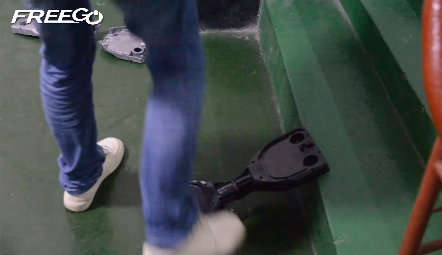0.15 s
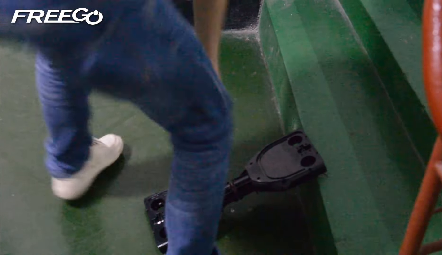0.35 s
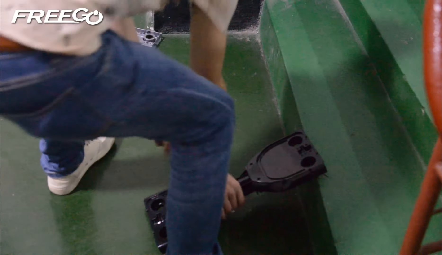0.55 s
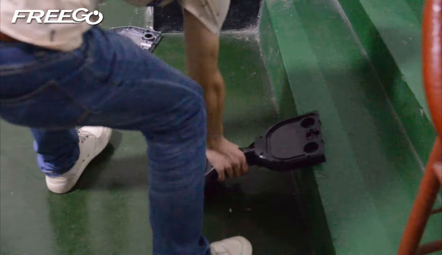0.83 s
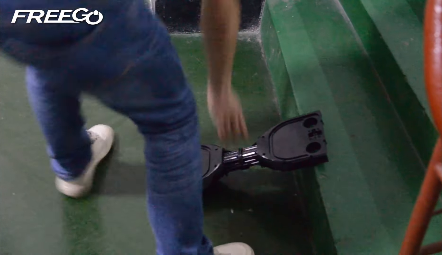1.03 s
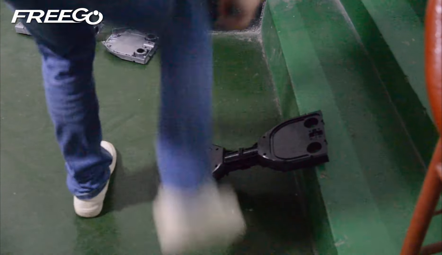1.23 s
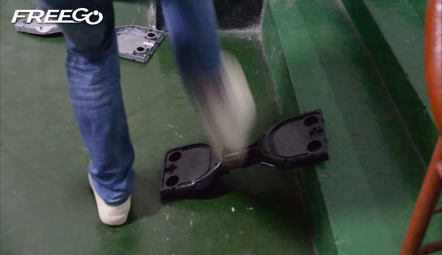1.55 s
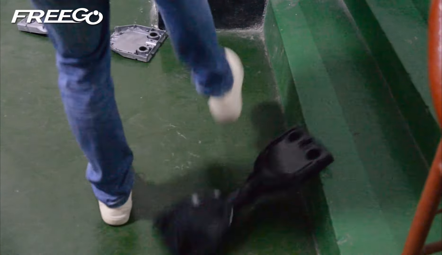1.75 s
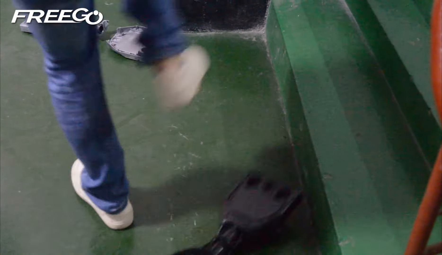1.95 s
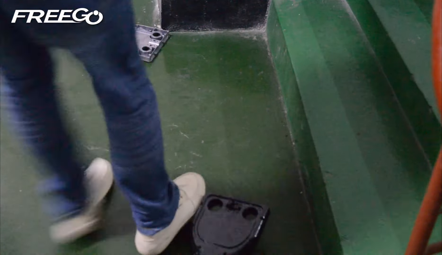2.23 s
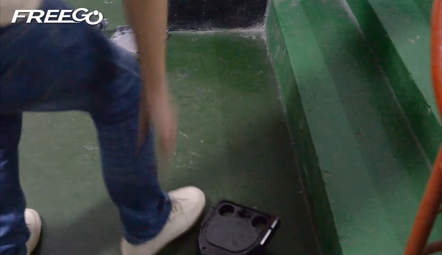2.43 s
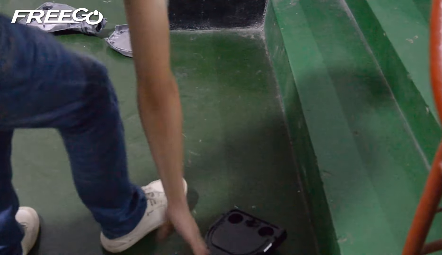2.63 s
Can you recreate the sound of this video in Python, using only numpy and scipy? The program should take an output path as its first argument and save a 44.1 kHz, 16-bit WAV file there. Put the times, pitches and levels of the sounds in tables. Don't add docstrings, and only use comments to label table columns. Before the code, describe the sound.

Shoe stamps on a metal scooter frame, hard clattering knocks with short rings in a bare hall

```python
import sys
import numpy as np
from scipy import signal
from scipy.fft import rfft, irfft
from scipy.io import wavfile

SR = 44100
rng = np.random.default_rng(int(sys.argv[2]) if len(sys.argv) > 2 else 0)


def dump_mix(stems):
    frames = np.atleast_2d(stems).T
    limited = np.clip(frames, -1, 1)
    pcm = np.round(limited * 32767).astype(np.int16)
    wavfile.write(sys.argv[1], SR, pcm)


def invert_db(level):
    return 10 ** (np.asarray(level, dtype=float) / 20)


N = 121275
LEAD = SR // 2

# freq_hz, density_db_per_hz
AIR_SPECTRUM = [(25, -60), (55, 18.5), (130, 1.5), (300, 8.5), (800, -3.5), (2000, -1), (4000, -11),
                (15600, -28.5)]
# freq_hz, width_hz, level_db
MACHINE_HUMS = [
    (52.8, 48, -47.5),
    (187.6, 15, -49),
]
# freq_hz, t60_s
HALL_DECAY = [(125, 1.76), (500, 1.35), (1000, 1.42), (2000, 1.225), (4000, 1.277), (8000, 1.03),
              (15000, 0.16)]
# start_s, level_db, pitch_hz
SOLE_THUMPS = [
    (0.244, -26, 265),
    (0.274, -13.5, 306),
    (1.011, -12, 264),
    (1.031, -21, 297),
    (2.658, -44, 125),
]
# start_s, length_s, level_db
SHOE_SCUFFS = [
    (0.09, 0.18, -33.5),
    (0.875, 0.13, -39),
    (2.247, 0.25, -33.5),
    (2.383, 0.05, -29),
    (2.5, 0.24, -43),
]
# start_s, level_db
GRIT_TICKS = [(2.284, -47), (2.299, -42), (2.310, -41), (2.349, -43), (2.525, -43), (2.535, -46)]
# freq_hz, density_db_per_hz
SCUFF_SPECTRUM = [(800, 15), (3500, -9), (9000, -3), (15000, -14)]
# start_s, level_db, lowest_mode_db, crack_db, brightness_db
WEDGED_KNOCKS = [
    (-.3, -13, 1, 8.5, -12),
    (.2409, 0, -4.5, 4, 0.5),
    (.255, -2, -3.5, 9, 1.5),
    (.268, -1, 2.5, 9.5, 5),
    (.293, 1.5, -3, 10.5, 0.5),
    (.375, -3, 1, 6.5, 1.5),
    (.435, -3.5, 1.5, 8.5, -2),
    (.7627, -28, -6, 12, -9),
]
# start_s, level_db, lowest_mode_db, crack_db, brightness_db
LANDING_KNOCKS = [
    (1.008, -25, -2, 14, 1),
    (1.0126, -9, 10, 10, 7),
    (1.037, -25, 2, 9, 10.5),
    (1.056, -18.5, 3, 7.5, -1.5),
    (1.075, -16, -17, 7, -7.5),
]
# start_s, level_db, lowest_mode_db, crack_db, brightness_db
LOOSE_KNOCKS = [(1.1548, -17.5, 9.5, 3, -4.5), (1.17, -19, 4, -11, -2), (1.2531, -5.5, -3.5, 1.5, -3.5),
                (1.3628, -5.5, 1.5, 4, -1.5), (1.3753, -3, -0.5, 6.5, 2), (1.4272, 1, 3, 0.5, 1.5),
                (1.466, -7.5, 4.5, 0, -1.5), (1.505, -13.5, -9, -5, -5.5), (1.5963, -5.5, 6, 3.5, -2.5),
                (1.6716, -5.5, 5, 2, 0), (2.0547, -9.5, 0, -0.5, -4.5), (2.118, -22, 2, 6, -16),
                (2.315, -20, 4.5, -3, -9), (2.352, -25.5, 8, 3, -3), (2.4104, -19, 3, -2, 3.5),
                (2.46, -28.5, 5, 3, 2.5)]
# freq_hz, width_hz, level_db
MODES_WEDGED = [(992, 80, 0), (1520, 60, -8), (1945, 60, -1), (2755, 40, -7), (3035, 36, -12),
                (3532, 36, -10), (4010, 34, -14), (4720, 30, -12), (5045, 55, -14), (5800, 150, -14),
                (6800, 90, -15), (7293, 44, -17), (7915, 30, -16), (9235, 36, -20)]
# freq_hz, width_hz, level_db
MODES_LANDING = [(655, 60, -8), (762, 60, -6), (900, 70, -6), (1020, 70, -4), (1127, 50, -5),
                 (1237, 50, -6), (1803, 80, -6), (2061, 60, -4), (2150, 60, -6), (2760, 50, -10),
                 (3900, 140, -17), (5400, 150, -18), (7280, 80, -23)]
# freq_hz, width_hz, level_db
MODES_LOOSE = [(1008, 46, 0), (2025, 32, -7), (2765, 36, -9), (3045, 44, -13), (3480, 36, -15),
               (3700, 50, -20), (4150, 70, -19), (4715, 30, -21), (5015, 40, -21), (5700, 90, -21),
               (6200, 50, -21), (6720, 70, -21), (7275, 36, -22), (9225, 30, -26)]
# freq_hz, density_db_per_hz
FLOOR_CRACK = [(200, -57), (450, -10), (650, -38), (900, -5), (1350, -19), (1750, -3.5), (4000, -24.5),
               (9000, -30), (15600, -45)]
# freq_hz, density_db_per_hz
STAMP_CRACK = [(200, -62), (560, -70), (800, -12.5), (1000, -4), (1350, -15), (1800, -3), (4000, -14),
               (9000, -22.5), (15600, -36)]
# time_s, gain_db
INPUT_GAIN = [(0, 3.5), (0.248, 4.5), (0.273, -9.5), (0.292, -13.5), (.4, -9), (.52, -11), (.64, -9.5),
              (.8, -5.5), (1.019, 2.5), (1.1, -1), (1.36, -3), (1.42, -5.5), (1.6, -7.5), (1.752, -9.5),
              (1.842, -4), (2.75, 3)]


def unit(x):
    return x / np.sqrt(np.mean(x ** 2))


def log_hz(n):
    return np.log2(np.maximum(np.fft.rfftfreq(n, 1 / SR), 10))


def colour(x, points, tilt_db=0.):
    octave = log_hz(len(x))
    p = np.array(points)
    gain_db = np.interp(octave, np.log2(p[:, 0]), p[:, 1]) + tilt_db * (octave - 11) / 2
    return irfft(rfft(x) * invert_db(gain_db), len(x))


def ring(x, freq_hz, width_hz):
    radius = np.exp(-np.pi * width_hz / SR)
    w = 2 * np.pi * freq_hz / SR
    return signal.lfilter([0, np.sin(w)], [1, -2 * radius * np.cos(w), radius * radius], x)


def add(out, start_s, x):
    i = int(start_s * SR) + LEAD
    out[i:i + len(x)] += x[:len(out) - i]


def background():
    air_db = -32.5
    out = invert_db(air_db) * unit(colour(rng.standard_normal(N), AIR_SPECTRUM))
    for freq_hz, width_hz, db in MACHINE_HUMS:
        out += invert_db(db) * unit(ring(rng.standard_normal(N), freq_hz, width_hz))
    return out


def hall(x):
    level_db, build_s = 1, 0.0056
    t = np.arange(2 * SR) / SR
    p = np.array(HALL_DECAY)
    noise = rfft(rng.standard_normal(len(t)))
    octave = log_hz(len(t))
    tail = np.zeros(len(t))
    for centre in np.arange(6, 14.6, .5):
        band = irfft(noise * np.clip(1 - 2 * abs(octave - centre), 0, 1), len(t))
        t60_s = np.interp(centre, np.log2(p[:, 0]), p[:, 1])
        tail += band * invert_db(-60 * t / t60_s)
    tail = tail * (1 - np.exp(-t / build_s)) / np.sqrt(SR / 20)
    return invert_db(level_db) * signal.fftconvolve(x, tail)[:len(x)]


def shoes():
    out = np.zeros(N + LEAD)
    t = np.arange(SR // 8) / SR
    for start_s, db, pitch_hz in SOLE_THUMPS:
        add(out, start_s, invert_db(db) * np.sin(2 * np.pi * pitch_hz * t) * np.exp(-t / 0.004))
    hiss = unit(colour(rng.standard_normal(N), SCUFF_SPECTRUM))
    for start_s, length_s, db in SHOE_SCUFFS:
        n = int(length_s * SR)
        piece = hiss[int(start_s * SR):][:n]
        swell = np.sin(np.pi * np.arange(n) / n / 1.2)[:len(piece)]
        add(out, start_s, invert_db(db) * piece * swell)
    for start_s, db in GRIT_TICKS:
        add(out, start_s, invert_db(db) * hiss[int(start_s * SR):][:400] * np.exp(-t[:400] / 0.0013))
    return out


def crack(t, fade, spectrum, bright_db):
    burst = rng.standard_normal(len(t)) * (np.exp(-t / .004) + .6 * fade) * (1 - np.exp(-t / .0012))
    pad = SR // 100
    return 8 * colour(np.roll(burst, pad), spectrum, bright_db)[pad:-SR // 10]


def mode_pairs(taps, modes, low_db, bright_db):
    detune, split_widths, scatter_db, top_hz = .003, .7, 2.5, 10500
    scatter = rng.standard_normal((len(modes), 3))
    tone = np.zeros(len(taps))
    for k, (freq_hz, width_hz, mode_db) in enumerate(modes):
        base_db = mode_db + bright_db * np.log2(freq_hz / 2000) / 2 + low_db * (k == 0)
        for j in range(2):
            level = invert_db(base_db + scatter_db * scatter[k, 1 + j]) * np.sqrt(width_hz / 60)
            pitch_hz = freq_hz * (1 + detune * scatter[k, 0]) + (j - .5) * split_widths * width_hz
            tone += level * ring(taps, pitch_hz, width_hz / 2)
    return signal.sosfilt(signal.butter(4, top_hz, fs=SR, output="sos"), tone)


def frame(knocks, modes, crack_spectrum):
    crack_level_db, ring_level_db, chatter_s, low_cut_hz = -7, -3, 0.016, 516
    out = np.zeros(N + LEAD)
    t = np.arange(SR // 2) / SR
    fade = np.exp(-t / chatter_s)
    for start_s, db, low_db, crack_db, bright_db in knocks:
        taps = rng.standard_normal(len(t)) * (rng.random(len(t)) < .02) * fade * 0.2
        taps[0] = 1
        noise = crack(t, fade, crack_spectrum, bright_db)
        tone = mode_pairs(taps, modes, low_db, bright_db)
        add(out, start_s, invert_db(db + crack_level_db + crack_db) * noise)
        add(out, start_s, invert_db(db + ring_level_db) * tone)
    return signal.sosfilt(signal.butter(4, low_cut_hz, "high", fs=SR, output="sos"), out)


def scene():
    near = shoes()
    near += frame(WEDGED_KNOCKS, MODES_WEDGED, STAMP_CRACK)
    near += frame(LANDING_KNOCKS, MODES_LANDING, FLOOR_CRACK)
    near += frame(LOOSE_KNOCKS, MODES_LOOSE, STAMP_CRACK)
    return ((near + hall(near))[LEAD:] + background())[None]


def roll_off(x):
    return signal.sosfilt(signal.butter(12, 15750, fs=SR, output="sos"), x)


def record(dry):
    ceiling, bass_hz, bass_duck, top_hz, bottom_hz = .99, 112, 0.55, 15750, 40
    g = np.array(INPUT_GAIN)
    gain_db = np.interp(np.arange(N) / SR, g[:, 0], g[:, 1])
    x = np.clip(dry * invert_db(gain_db), -ceiling, ceiling)
    bass = signal.sosfiltfilt(signal.butter(2, bass_hz, fs=SR, output="sos"), x)
    bass_gain = invert_db(bass_duck * (gain_db - gain_db.max()))
    x = x + (bass_gain - 1) * bass
    x = signal.sosfilt(signal.ellip(10, .2, 65, top_hz, fs=SR, output="sos"), x)
    x = signal.sosfilt(signal.butter(2, bottom_hz, "high", fs=SR, output="sos"), x)
    return roll_off(x)


dry = scene()
out = record(dry)
dump_mix(out)
```